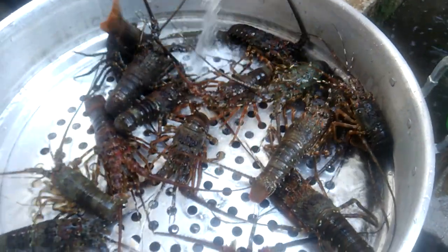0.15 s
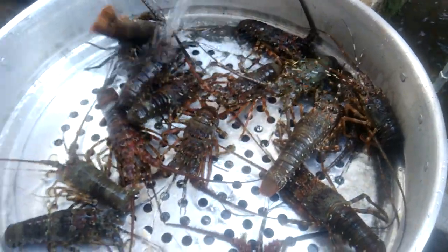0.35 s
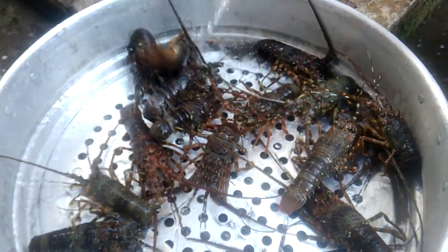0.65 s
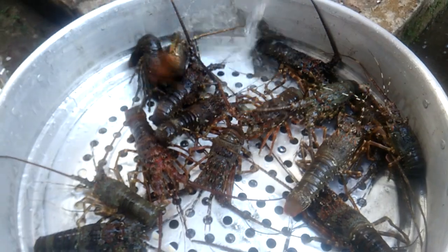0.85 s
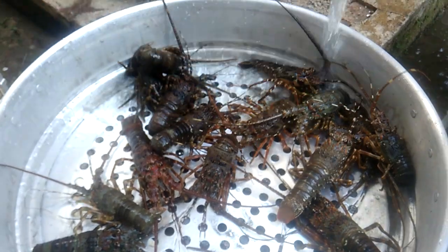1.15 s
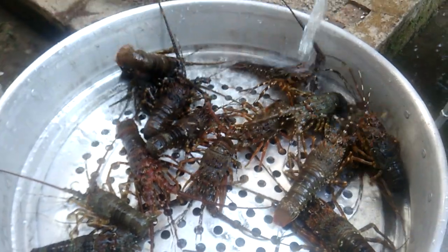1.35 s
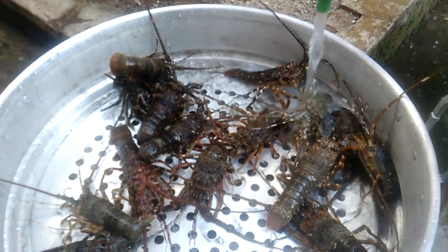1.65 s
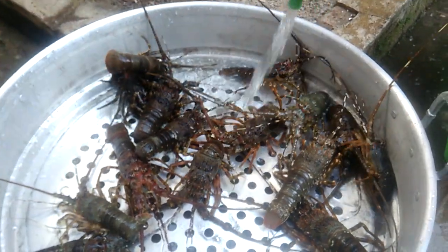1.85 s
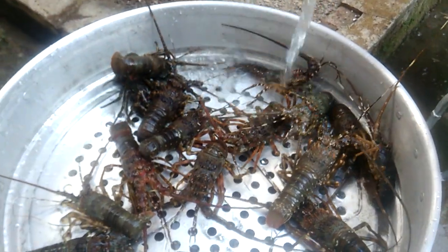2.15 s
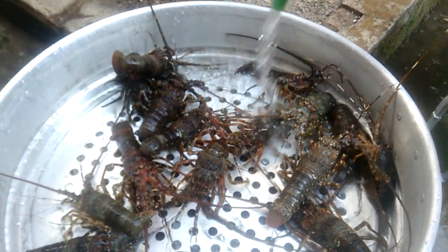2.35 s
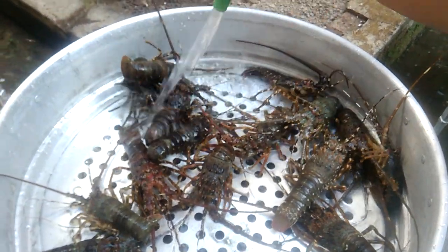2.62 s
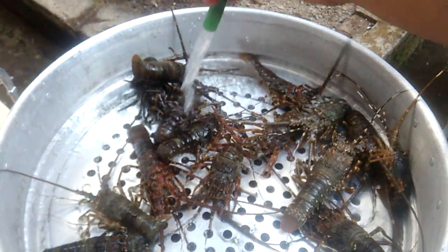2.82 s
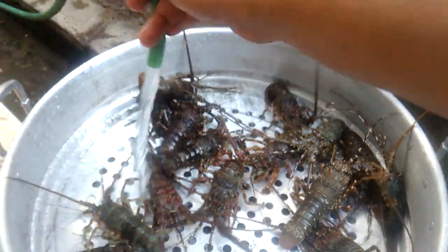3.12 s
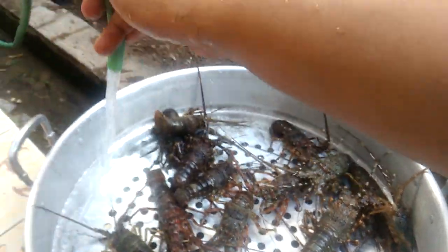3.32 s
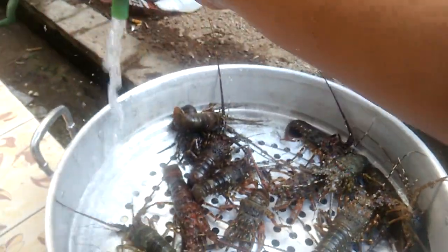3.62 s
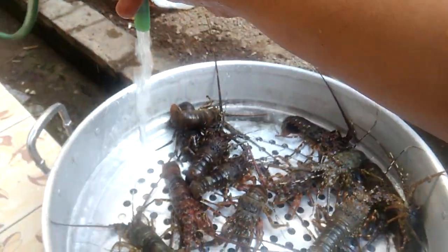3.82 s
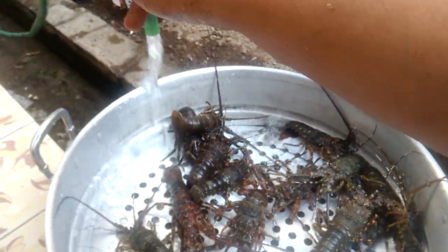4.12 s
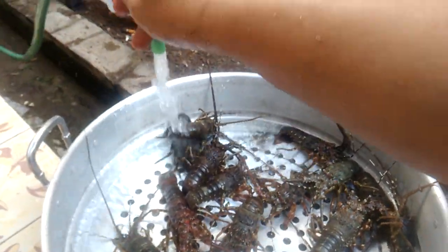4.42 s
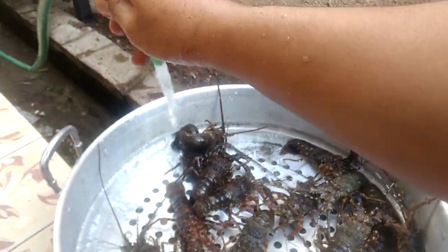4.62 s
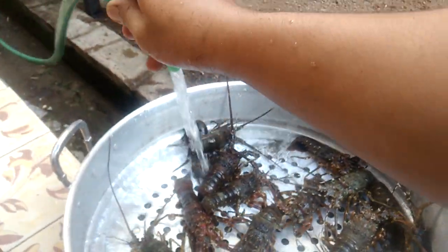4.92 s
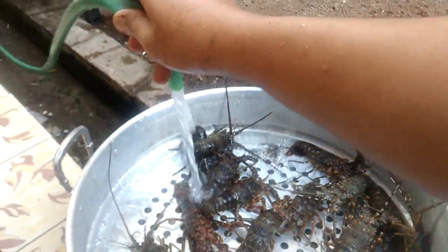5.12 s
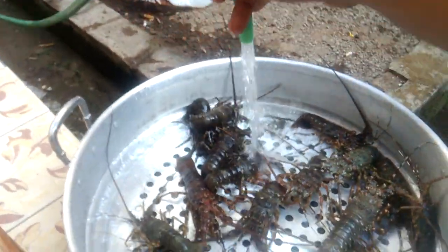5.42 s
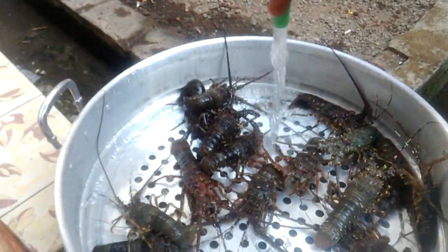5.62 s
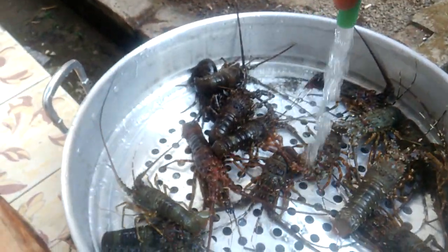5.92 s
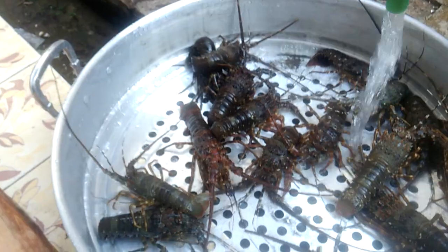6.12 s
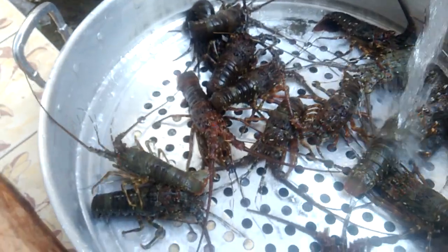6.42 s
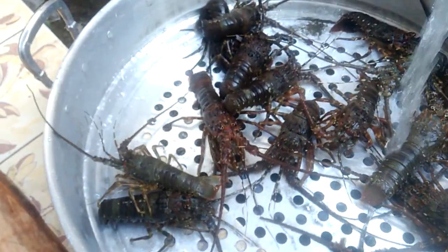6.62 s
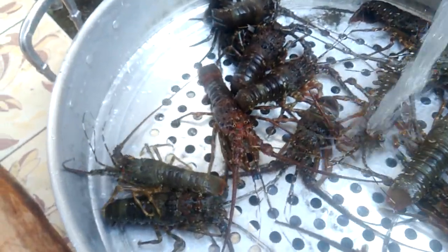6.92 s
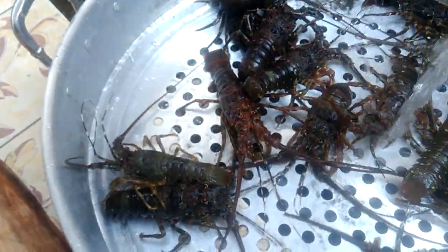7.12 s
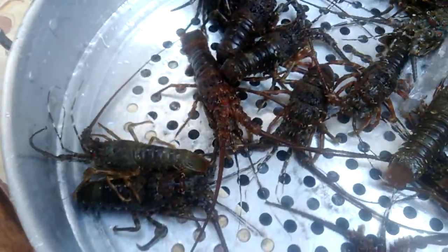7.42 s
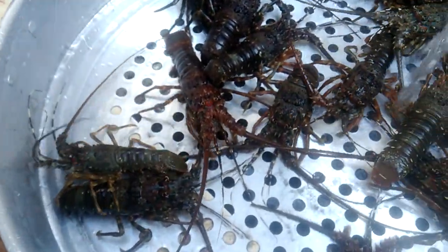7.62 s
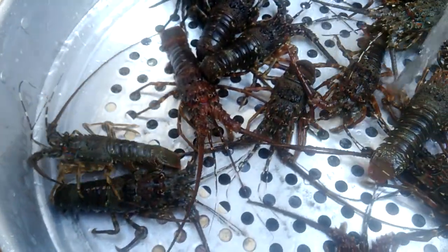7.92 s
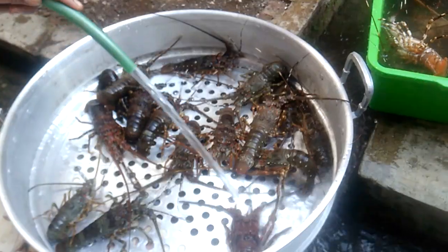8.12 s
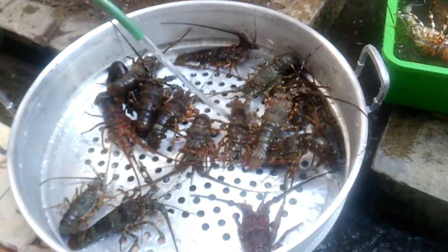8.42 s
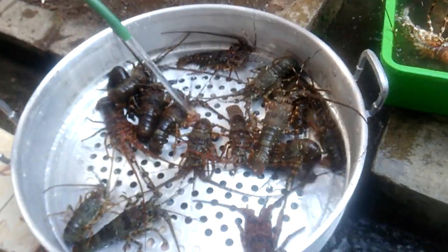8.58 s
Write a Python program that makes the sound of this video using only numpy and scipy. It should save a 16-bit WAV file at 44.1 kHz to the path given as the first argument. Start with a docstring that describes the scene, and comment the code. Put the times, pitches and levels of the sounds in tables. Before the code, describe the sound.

Water runs continuously from a garden hose onto hard shells and thin metal, crisp and sizzling, slightly wide in the treble. Slapping lumps and low thuds crowd the first second; two clanks ring the pot around three seconds. Patter and gurgles wander, a gliding hiss rises toward seven seconds, and a sudden cut leaves quieter water over low rumble.

```python
"""A garden hose jet plays over spiny lobsters in a perforated aluminium steamer pot, outdoors.
Random impacts, filtered and rung, crackle on shells, patter in film and drum on metal in lumps; pools gurgle.
Slugs splat, big drops spit, shells tick, bubbles and air pockets ring; the jet fans off a shell's back.
Two knocks ring the modes of the pot.
Near the end, an abrupt cut: steady water is suddenly fainter and a second low rumble joins."""
import sys
import numpy as np
from scipy import signal
from scipy.fft import rfft, irfft
from scipy.io import wavfile
from scipy.ndimage import uniform_filter1d, minimum_filter1d

SR = 44100
rng = np.random.default_rng(int(sys.argv[2]) if len(sys.argv) > 2 else 0)


def log_audio(samples):
    """Write samples as a 16-bit WAV file to the path given in sys.argv[1]."""
    # one column per channel
    frames = np.atleast_2d(samples).T
    # limit to full scale, then quantise
    limited = np.clip(frames, -1, 1)
    pcm = np.round(limited * 32767).astype(np.int16)
    wavfile.write(sys.argv[1], SR, pcm)


N = 385875

# Levels are those at each source, ahead of drift, gliding colour and limiter.
# Jet on the shells, before CUT_WATER_DB: time_s [s], spray_db [dB]
ON_SHELLS = [(0, -45), (1.0, -41.5), (1.65, -41.5), (2.03, -46), (2.3, -42.5), (3.05, -43.5), (3.38, -50.5),
             (3.75, -43), (4.12, -49), (4.3, -46.5), (4.6, -48.5), (4.9, -45), (5.17, -52), (5.7, -43),
             (6.4, -44.5), (6.75, -49.5), (6.98, -44), (7.12, -42), (7.32, -38), (7.52, -44), (7.75, -36),
             (7.97, -37.5), (8.13, -43), (8.16, -29), (8.3, -31.5), (8.5, -25)]
# Jet in the water film, before CUT_WATER_DB: time_s [s], patter_db [dB]
ON_FILM = [(0, -56), (0.6, -52), (0.95, -54), (1.08, -45), (1.65, -47.5), (1.9, -54), (2.45, -60),
           (2.65, -62.5), (3.0, -56), (3.5, -57), (3.9, -57.5), (4.12, -78), (4.35, -57), (4.6, -67),
           (5.05, -55.5), (5.2, -65.5), (5.48, -54), (5.62, -64), (5.82, -51), (6.17, -57), (6.35, -49),
           (6.57, -58), (6.9, -48), (7.15, -51), (7.33, -47), (7.5, -50.5), (7.85, -46.5), (8.0, -50.5),
           (8.13, -44.5), (8.25, -41.5), (8.55, -38)]
# Jet on the bare pot floor, before CUT_WATER_DB: time_s [s], drumming_db [dB]
ON_METAL = [(0, -61.5), (0.95, -61), (1.08, -51.5), (1.55, -49.5), (1.95, -54.5), (2.35, -55), (2.7, -70.5),
            (3.0, -60), (3.7, -70), (4.05, -57.5), (4.55, -64.5), (5.0, -58.5), (5.6, -69), (6.5, -66.5),
            (7.25, -66.5), (7.75, -59), (8.13, -65), (8.2, -42.5), (8.5, -47)]
# Jet in pooled water, before CUT_WATER_DB: time_s [s], gurgle_db [dB]
IN_POOL = [(0, -64), (0.8, -70.5), (1.6, -70.5), (2.0, -59.5), (2.35, -69), (3.1, -60), (3.75, -67),
           (4.1, -54.5), (4.55, -65), (4.9, -59), (5.15, -66), (5.45, -68.5), (5.85, -60), (6.9, -66),
           (7.7, -61), (8.1, -63.5), (8.6, -41)]
# Resonances of the spot being hit: time_s [s], water_hollow_hz [Hz], pot_floor_hz [Hz]
SPOT = [(0, 4000, 670), (0.55, 3260, 696), (0.9, 2260, 690), (1.08, 2250, 1320), (1.3, 3100, 1030),
        (1.9, 2900, 1030), (2.2, 2390, 1370), (2.7, 2900, 795), (3.22, 2200, 820), (3.8, 3150, 780),
        (4.24, 2050, 800), (4.75, 3260, 810), (5.5, 2900, 820), (6.0, 2550, 670), (6.35, 3300, 660),
        (6.7, 2000, 726), (7.0, 2500, 766), (7.32, 2090, 1300), (7.75, 2220, 1290), (8.0, 2450, 705),
        (8.13, 3100, 694), (8.19, 3280, 1300), (8.5, 3120, 690)]
# Colour glide as the jet crosses the shells: time_s [s], centre_hz [Hz], gain_db [dB]
GLIDE = [(0, 5100, -1.5), (1.65, 4800, -0.5), (1.95, 4340, -2.5), (4.3, 5200, -1), (5.2, 4290, -5.5),
         (5.7, 5100, -2.5), (6.17, 4620, -7), (6.35, 5000, -1), (6.58, 4400, -10), (6.85, 5270, 0),
         (6.98, 5500, 5.5), (7.13, 5500, -4.5), (7.32, 3880, -20), (7.5, 4050, -4.5), (7.66, 4730, 2),
         (7.8, 4740, -9.5), (8.13, 5300, -13), (8.3, 4540, 1.5)]
# Outdoor rumble: time_s [s], level_db [dB]
RUMBLE = [(0, -53), (0.75, -63.5), (1.05, -53.5), (2.2, -56), (2.45, -62.5), (2.95, -49.5), (3.5, -57),
          (4.45, -61), (4.8, -57), (6.7, -59), (8.0, -68)]
# Slugs of water: start_s [s], slap_db [dB], floor_thud_db [dB], gurgle_db [dB], drain_t60_s [s]
SPLATS = [(0.2034, -47, -37.5, -51, 0.097), (0.394, -43, -71, -72, 0.069), (0.536, -40.5, -51, -69, 0.11),
          (0.685, -47, -41, -56, 0.23), (0.752, -33, -34, -49, 0.16), (0.813, -46, -38.5, -49, 0.37),
          (0.833, -32.5, -38, -48, 0.12), (1.29, -41, -70, -72, 0.27), (1.517, -41, -39, -54, 0.13),
          (2.241, -39.5, -62, -79, 0.27), (2.393, -47, -70, -79, 0.5), (2.593, -53, -66, -49, 0.14),
          (2.822, -39, -54, -59, 0.31), (2.847, -41, -36, -44, 0.38), (3.213, -32, -38, -43.5, 0.19),
          (3.262, -46, -46, -54, 0.25), (3.387, -56, -44, -56, 0.063), (3.747, -40.5, -79, -84, 0.38),
          (3.909, -43.5, -38, -45.5, 0.083), (4.052, -66, -50, -46, 0.1), (4.164, -70, -60, -43.5, 0.064),
          (4.198, -39, -68, -76, 0.44), (4.253, -43, -44.5, -67, 0.13), (4.695, -54, -48, -47, 0.12),
          (4.8, -75, -76, -51, 0.097), (5.759, -49.5, -48, -54, 0.15), (6.477, -45.5, -47, -69, 0.085),
          (6.659, -49, -45.5, -70, 0.042), (6.99, -53, -44.5, -72, 0.2), (7.306, -46, -62, -71, 0.29),
          (7.647, -38.5, -63, -48, 0.11), (8.521, -50, -51, -50, 0.23)]
# Shell ticks and big drops: start_s [s], crack_peak_db [dB], hollow_note_db [dB re crack_peak_db]
TICKS = [(0.2843, -28, -41), (0.3536, -18, -17.5), (0.4436, -16.5, -18), (0.522, -26, -34),
         (0.5464, -15.5, -19), (0.6992, -17, -20), (0.78, -18, -34), (0.858, -23, -15.5), (0.91, -19, -25),
         (0.9372, -21, -36), (0.989, -16.5, -51), (1.129, -21, -35), (1.1496, -17, -18),
         (1.2455, -19.5, -16), (1.5267, -15.5, -14), (1.6431, -23.5, -12.5), (1.731, -21, -14),
         (1.7918, -19, -24), (2.154, -21, -31), (2.2425, -20, -35), (2.595, -25, -35), (2.9547, -16, -16),
         (3.4924, -20, -16.5), (4.0561, -22.5, -22), (4.511, -28.5, -19), (5.4538, -19, -42),
         (5.8546, -26.5, -24), (6.1406, -23, -38), (6.146, -25, -44), (6.4414, -22.5, -36),
         (6.6078, -25, -30), (6.9617, -37, -24), (6.988, -29, -21), (7.1748, -18.5, -39),
         (7.18, -17.5, -35), (7.229, -17, -37), (7.251, -13, -26), (7.39, -22, -28), (7.608, -20.5, -23),
         (7.622, -21.5, -30), (7.6536, -18.5, -22.5), (7.6645, -20, -11), (7.876, -21, -33),
         (7.94, -18, -42), (8.272, -29, -42), (8.49, -25.5, -42), (8.529, -20, -27)]
# Big drops bursting on shells: start_s [s], spray_db [dB], t60_s [s]
SPITS = [(.2849, -34, 0.35), (.3955, -40, .07), (.445, -38, 0.093), (1.041, -35, .16), (1.257, -37, 0.07),
         (1.31, -38, .14), (1.404, -34.5, 0.36), (1.66, -34.5, 0.29), (2.2857, -37, 0.062),
         (3.053, -48, 0.1), (4.693, -37, 0.17), (4.885, -37.5, 0.18), (5.0, -37.5, 0.15),
         (5.973, -33.5, 0.11), (6.035, -36.5, 0.044), (6.0816, -34, 0.044), (6.279, -33.5, 0.055),
         (6.352, -35, 0.22), (6.582, -34.5, 0.059), (7.305, -35, 0.17), (8.404, -40.5, 0.23)]
# Single bubbles, before onset and pitch rise: start_s [s], level_db [dB], pitch_hz [Hz], t60_s [s]
BLIPS = [(.519, -20, 5650, 0.024), (1.022, -23.5, 5460, 0.029), (1.036, -31, 1600, 0.045),
         (1.185, -28, 1580, 0.028), (1.879, -32, 990, 0.032), (2.193, -15, 5570, 0.015),
         (2.394, -37.5, 1060, 0.073), (3.752, -11.5, 2820, 0.01), (4.201, -17, 3240, 0.021),
         (4.255, -22, 3450, 0.024), (4.57, -32, 1550, 0.022), (5.978, -29.5, 2690, 0.016),
         (7.322, -29, 2040, 0.03), (7.688, -34, 1310, 0.034)]
# Knocks, one spot each: start_s [s], ring_db [dB], build_up_time_constant_s [s], clash_peak_db [dB]
KNOCKS = [(2.85, -33.5, 0.004, -7.5), (3.2141, -40, 0.0019, -10.5)]
# Pot modes: freq_hz [Hz], first_spot_db [dB re ring_db], second_spot_db [dB re ring_db], t60_s [s]
POT = [(267, -4, -4, 0.22), (537, -6.5, -16, 0.34), (732, 5.5, 7.5, 0.24), (854, 4, -19, 0.23),
       (1040, 3, 0, 0.24), (1100, 7, 5, 0.15), (1189, 1.5, 5, 0.23), (1300, -3, -1, 0.32),
       (1416, 11, 15, 0.055), (1550, -8, -4, 0.29), (1730, -19, 4.5, 0.13), (2267, 5, 18, 0.058),
       (3300, -2, 4.5, 0.099), (3570, 6, 7, 0.065)]
# Narrow-band swells: ringing air between shells, and one low splash (8.152 s):
# start_s [s], length_s [s], level_db [dB], centre_hz [Hz], width_hz [Hz]
POCKETS = [(3.709, 0.056, -51.5, 2800, 240), (5.06, 0.065, -60, 2890, 200), (5.348, 0.2, -64, 2820, 150),
           (6.289, .14, -58, 4050, 1500), (7.901, .255, -58, 3540, 597), (8.152, .09, -58, 1140, 600)]
# Sheet of water off a shell's back; pitch glides, mostly downwards until 7.36 s, then creeps up:
# time_s [s], hiss_db [dB], hiss_hz [Hz]
FAN = [(5.5, -79, 12900), (6.3, -55, 12300), (6.78, -55.5, 11300), (6.85, -50, 10600), (7.04, -53, 11100),
       (7.13, -41.5, 9400), (7.26, -45, 7700), (7.36, -46, 6800), (7.5, -40.5, 7100), (7.7, -46.5, 6900),
       (7.95, -43, 7240), (8.138, -43, 8300), (8.146, -56, 8500)]
# Treble colour of spray, ticks and clashes, peaking near 7.3 kHz: freq_hz [Hz], gain_db [dB]
DROP_COLOUR = [(400, -35), (1500, -55), (3400, -24.5), (4600, -22), (5500, -11), (6300, -2.5), (6900, 2.5),
               (7300, 6), (8000, 0), (9000, -9), (10300, -15), (12000, -22.5), (14500, -25.5)]
# Spectrum of slaps in the water film: freq_hz [Hz], gain_db [dB]
PATTER_COLOUR = [(900, -14.5), (1250, -14.5), (1530, -5), (1700, -8.5), (1900, -5), (2060, -13),
                 (2240, -5.5), (2450, -7.5), (2700, -9), (3350, -5), (4000, -5.5), (4500, -3.5),
                 (5500, -0.5), (7000, -13.5)]
# Spectrum of the beaten pot floor: freq_hz [Hz], gain_db [dB]
DRUM_COLOUR = [(300, -14.5), (450, -7), (530, 1), (575, 4), (645, 11.5), (720, 6.5), (800, 8), (880, 5.5),
               (1000, 5), (1250, 2), (1600, 5), (2400, -2.5)]
# Spectrum of outdoor rumble: freq_hz [Hz], gain_db [dB]
RUMBLE_COLOUR = [(20, -38), (40, -4.5), (62, 6), (80, 9.5), (120, 2.5), (180, -2), (300, -23), (700, -51),
                 (2000, -16)]
# Side filter, wider at short wavelengths: freq_hz [Hz], side_gain_db [dB]
WIDTH = [(3500, -39), (5200, -22), (6300, -11.5), (7300, -11.5), (8500, -3.5), (13000, -1)]

CUTOFF_HZ = 14350
MIST_DB = 5.5  # peak lift of the top of the spray
SPLAT_RISE_T60_S, SPLAT_SPRAY_DB = 0.02, 2  # spray is relative to the slap
# Abrupt cut: time, step in the jet's four aim levels, rumble that joins
CUT_S, CUT_WATER_DB = 8.142, -22.5
NEW_RUMBLE_DB, NEW_RUMBLE_LOW_HZ, NEW_RUMBLE_HIGH_HZ = -52.5, 61, 151


def from_db(db):
    """Decibels to gain."""
    return 10 ** (np.asarray(db) / 20)


def rms_one(x):
    """Scale to unit rms."""
    return x / np.sqrt(np.mean(x ** 2) + 1e-20)


def in_time(rows):
    """Interpolate each column after time_s to sample rate."""
    time_s, *columns = np.transpose(rows)
    return [np.interp(np.arange(N) / SR, time_s, column) for column in columns]


def dying(t60_s, size=22050):
    """Exponential decay from 1, down 60 dB at t60_s."""
    return np.exp(-np.log(1000) * np.arange(size) / SR / t60_s)


def add(out, start_s, sound):
    """Mix a sound in at start_s."""
    at = max(round(start_s * SR), 0)
    out[..., at:at + sound.shape[-1]] += sound[..., :N - at]


def butter(x, hz, kind, order=2):
    """Causal Butterworth filter."""
    return signal.sosfilt(signal.butter(order, hz, kind, fs=SR, output="sos"), x + 1e-18)


def peak_band(x, hz, q):
    """Band of unit peak gain at hz."""
    return signal.lfilter(*signal.iirpeak(hz, q, fs=SR), x)


def coloured(x, spectrum, size=4096):
    """Causal minimum-phase filter with the given spectrum, built from its cepstrum."""
    hz, db = np.transpose(spectrum)
    bins_hz = np.maximum(np.arange(size // 2 + 1) * SR / size, 1)
    gain = from_db(np.interp(np.log(bins_hz), np.log(hz), db))
    cepstrum = irfft(np.log(gain))[:size // 2]
    cepstrum[1:] *= 2
    response = irfft(np.exp(rfft(cepstrum, size)))
    response = response.reshape((1,) * (x.ndim - 1) + (-1,))
    return signal.oaconvolve(x, response, axes=-1)[..., :x.shape[-1]]


def ring(clicks, hz, t60_s):
    """Two-pole resonator: a unit click sets off a decaying sine of height 1."""
    r = np.exp(-np.log(1000) / (t60_s * SR))
    w = 2 * np.pi * hz / SR
    return signal.lfilter([0, np.sin(w)], [1, -2 * r * np.cos(w), r * r], clicks + 1e-18)


def impacts(per_s, spread_db):
    """Clicks of either sign at random moments; dB heights are exponential, capped at 4 spreads."""
    clicks = np.zeros(N)
    at = np.flatnonzero(rng.random(N) < per_s / SR)
    chance = rng.uniform(-1, 1, N)[at]
    height_db = spread_db * np.minimum(-np.log(np.abs(chance)), 4)
    clicks[at] = np.sign(chance) * from_db(height_db)
    return clicks


def packets(per_s, spread_db, t60_s, steady):
    """Envelope of sudden surges that die away over a steady part; mean power 1."""
    power = signal.oaconvolve(impacts(per_s, spread_db) ** 2, dying(t60_s / 2))[:N]
    return np.sqrt((np.abs(power) / power.mean() + abs(steady)) / (1 + abs(steady)))


def bubbles(low_hz, high_hz, per_s, cycles, spread_db, count=14):
    """Bubbles ring for some cycles to -60 dB, with equal energy at every pitch; rms 1."""
    born = impacts(per_s, spread_db)
    dealt = rng.integers(0, count, N)
    out = 0
    for k, hz in enumerate(np.geomspace(low_hz, high_hz, count)):
        out = out + np.sqrt(hz) * ring(born * (dealt == k), hz, cycles / hz)
    return rms_one(out)


def in_pot(clicks, t60_s, echo_db, count=4):
    """Impacts on several spots, each with its own quick wall reflections; rows are mid and side."""
    dealt, out = rng.integers(0, count, N), 0
    for spot in range(count):
        echoes = rng.standard_normal((2, 4096)) * dying(t60_s, size=4096)
        echoes *= from_db(echo_db) / np.linalg.norm(echoes, axis=1, keepdims=True)
        echoes[:, 0] = 1, np.cos(np.pi * (spot + .5) / count)  # direct sound
        out = out + signal.oaconvolve((clicks * (dealt == spot))[None], echoes, axes=1)[:, :N]
    return out / np.sqrt(1 + from_db(echo_db) ** 2)


def wander(depth_db, rate_hz):
    """Randomly drifting gain: noise at SR / 40 through two one-pole low-passes at rate_hz."""
    r = np.exp(-80 * np.pi * rate_hz / SR)
    slow = signal.lfilter([1], [1, -2 * r, r * r], rng.standard_normal(N // 40 + 2002))[2000:]
    return np.repeat(from_db(depth_db * np.clip(rms_one(slow), -2, 2)), 40)[:N]


def hollows(x, low_hz, high_hz, q, depth_db, rate_hz, count=8):
    """Gaps between shells open and flood as the jet moves, so their resonances come and go."""
    y = x
    for hz in np.geomspace(low_hz, high_hz, count):
        y = y + (wander(depth_db, rate_hz) - 1) * peak_band(y, hz, q)
    return y * np.std(x) / np.std(y)


def gliding(x, hz, gain_db, q, size):
    """Cut or boost that follows curves of pitch and gain, block by block."""
    y, state = x.copy(), np.zeros(x.shape[:-1] + (2,))
    for i in range(0, N, size):
        peak = signal.iirpeak(hz[i], q, fs=SR)
        band, state = signal.lfilter(*peak, x[..., i:i + size], zi=state)
        y[..., i:i + size] += (from_db(gain_db[i]) - 1) * band
    return y


def swept(x, hz, q, boost_db):
    """Resonance that follows a pitch curve at unchanged overall level."""
    y = gliding(x, hz, np.full(N, boost_db), q, size=512)
    return y * np.std(x) / np.std(y)


def spray(strength, mist_db):
    """Thousands of droplets a second crackle on the shells; rows are mid and side."""
    drops = rms_one(impacts(per_s=3600, spread_db=2.6))
    crackle = coloured(in_pot(drops * strength, t60_s=0.013, echo_db=1.0, count=8), DROP_COLOUR)
    crackle = crackle / np.std(coloured(drops, DROP_COLOUR))
    crackle = hollows(crackle, low_hz=5000, high_hz=14000, q=6.5, depth_db=2.4, rate_hz=18.0)
    # fine mist sizzles at the top
    return crackle + (from_db(mist_db) - 1) * peak_band(crackle, 12300, 3)


def patter(strength, spot_hz):
    """Drops slap into the water film and trap small bubbles."""
    hits = in_pot(impacts(per_s=2100, spread_db=1.5), t60_s=0.062, echo_db=2.0, count=2)[0]
    slaps = rms_one(coloured(hits, PATTER_COLOUR))
    slaps = hollows(slaps, low_hz=1600, high_hz=5220, q=5.6, depth_db=5.5, rate_hz=15.8)
    fizz = bubbles(low_hz=1626, high_hz=5400, per_s=420, cycles=50, spread_db=3.2, count=24)
    return strength * rms_one(swept(slaps + from_db(-9) * fizz, spot_hz, q=5.6, boost_db=6.0))


def drumming(strength, thud, spot_hz):
    """The jet beats one loaded, damped spot of the pot floor; a slug hits the whole floor at once."""
    floor = rms_one(coloured(impacts(per_s=1500, spread_db=0.5), DRUM_COLOUR))
    beats = hollows(floor, low_hz=513, high_hz=1600, q=19.0, depth_db=8.5, rate_hz=6.3, count=6)
    plips = bubbles(low_hz=593.0, high_hz=1670, per_s=320, cycles=55, spread_db=2.6, count=16)
    jet = swept(beats + from_db(-7.0) * plips, spot_hz, q=4.6, boost_db=9.0)
    return strength * rms_one(jet) + thud * floor


def gurgle(strength):
    """Large, short-lived bubbles where the jet digs into a pool; the pot's air booms with them."""
    glugs = bubbles(low_hz=220.3, high_hz=680, per_s=660, cycles=24.0, spread_db=3.5)
    boom = peak_band(glugs, 300, 6.0)
    return strength * rms_one(glugs + from_db(-3.5) * boom)


def droplets(strength):
    """Lone drops snap on the shells and trap small bubbles at many pitches."""
    snaps = bubbles(low_hz=6300, high_hz=9000, per_s=170, cycles=38, spread_db=3.4, count=16)
    plinks = bubbles(low_hz=2400, high_hz=6200, per_s=70, cycles=48, spread_db=3.2, count=24)
    return strength * (from_db(-8) * snaps + from_db(-24) * plinks)


def rumble(after_cut):
    """Low outdoor noise swells and sinks; a second band joins after the cut."""
    level_db, = in_time(RUMBLE)
    outdoor = rms_one(coloured(rng.standard_normal(N), RUMBLE_COLOUR, size=8192))
    edges_hz = [NEW_RUMBLE_LOW_HZ, NEW_RUMBLE_HIGH_HZ]
    joining = rms_one(butter(rng.standard_normal(N), edges_hz, "bandpass"))
    outdoor = from_db(level_db) * wander(depth_db=2.5, rate_hz=9.6) * outdoor
    return outdoor + from_db(NEW_RUMBLE_DB) * after_cut * joining


def splat_surges():
    """Each slug swells and drains away: strengths of slap, thud and gurgle, summed as power."""
    power = np.zeros((3, N))
    for start_s, *levels_db, t60_s in SPLATS:
        swell = (1 - dying(SPLAT_RISE_T60_S)) * dying(t60_s)
        add(power, start_s, np.outer(from_db(levels_db), swell / swell.max()) ** 2)
    return np.sqrt(power)


def ticks(tail_t60_s, tail_db, body_t60_s, size=4096):
    """Hard crack, scattering droplets and a shell's rough, hollow note; rows are mid and side."""
    out = np.zeros((2, N))
    snap = dying(.011, size)
    scatter = packets(per_s=490, spread_db=5.0, t60_s=0.0061, steady=0.24)
    for start_s, peak_db, hollow_db in TICKS:
        at = int(start_s * SR)
        after = scatter[at:at + size] * dying(tail_t60_s, size)
        bursts = rng.standard_normal((2, 2, size)) * np.array([[snap], [after]])
        crack, tail = coloured(bursts, DROP_COLOUR)
        both = crack / np.abs(crack).max(axis=1, keepdims=True)
        both = both + from_db(tail_db) * tail / np.abs(tail).max()
        # first contact: broad, bright, mid only
        edge = butter(rng.standard_normal(size) * snap ** 2, 6100, "highpass")
        add(out, start_s, from_db(peak_db) * (both + from_db(-16) * edge * [[1], [0]]))
        pitches_hz = np.array([1900, 3000, 3600]) * np.exp(rng.normal(0, 0.11, size=3))
        push = rng.standard_normal(size) * dying(body_t60_s, size)
        note = sum(ring(push, hz, 0.0081) for hz in pitches_hz)
        add(out[0], start_s, from_db(peak_db + hollow_db) * note / np.abs(note).max())
    return out


def spit_surges():
    """Each big drop bursts at once and its spatter thins out; summed as power."""
    power = np.zeros(N)
    for start_s, spray_db, t60_s in SPITS:
        add(power, start_s, (from_db(spray_db) * dying(t60_s)) ** 2)
    return np.sqrt(power)


def blips(glide):
    """A bubble rings unevenly, its pitch rising by the fraction glide as it nears the surface."""
    out = np.zeros(N)
    for start_s, level_db, hz, t60_s in BLIPS:
        decay = dying(t60_s)
        wobble = rms_one(butter(rng.standard_normal(len(decay)), 400, "lowpass"))
        pitch_hz = hz * (1 + glide * (1 - dying(t60_s * 2)) + .05 * wobble)
        tone = np.sin(2 * np.pi * np.cumsum(pitch_hz) / SR)
        add(out, start_s, from_db(level_db) * decay * (1 - dying(0.02)) * tone)
    return out


def knocks(clash_t60_s):
    """A blow gives a rattling clash and sets the pot's modes ringing; rows are mid and side."""
    out = np.zeros((2, N))
    modes_hz, *spots_db, t60s_s = np.transpose(POT)
    decays = np.array([dying(t60_s) for t60_s in t60s_s])
    size = decays.shape[1]
    # the shifting load damps each mode unevenly
    decays = decays * [wander(depth_db=2.0, rate_hz=35)[:size] for _ in modes_hz]
    turns = np.outer(modes_hz, np.arange(size) / SR)
    rattle = packets(per_s=260, spread_db=-2.0, t60_s=0.013, steady=0.55)[-size:]
    for (start_s, ring_db, build_s, clash_db), mode_db in zip(KNOCKS, spots_db):
        sines = np.sin(2 * np.pi * (turns + rng.random((len(modes_hz), 1))))
        rings = from_db(ring_db + mode_db) @ (decays * sines)
        add(out[0], start_s, rings * (1 - dying(build_s * np.log(1000))))
        clash = rng.standard_normal((2, size)) * rattle * dying(clash_t60_s)
        clash = butter(coloured(clash, DROP_COLOUR), 5100, "lowpass")
        add(out, start_s, from_db(clash_db) * clash / np.abs(clash).max())
    return out


def pockets():
    """Narrow bands of noise swell and fade: stirred air ringing, and one low splash."""
    out = np.zeros(N)
    for start_s, length_s, level_db, hz, width_hz in POCKETS:
        stir = rng.standard_normal(SR)
        note = rms_one(butter(stir, [hz - width_hz / 2, hz + width_hz / 2], "bandpass"))
        swell = signal.windows.tukey(int(length_s * SR), .3)
        add(out, start_s, from_db(level_db) * swell * note[-len(swell):])
    return out


def fan(strength, hz):
    """A thin sheet tears into droplets that hiss in one gliding resonance; rows are mid and side."""
    drops = in_pot(impacts(per_s=14000, spread_db=3.0), t60_s=0.015, echo_db=-6)
    drops = butter(drops, 3800, "highpass")
    hiss = swept(drops, np.minimum(hz, .45 * SR), q=5.0, boost_db=15)
    return strength * hiss / np.std(hiss[0])


def scene():
    """Aim shares out the jet; common lumps drive the steady spray, patter, drumming and fan."""
    hollow_hz, floor_hz = in_time(SPOT)
    fan_db, fan_hz = in_time(FAN)
    after_cut = np.arange(N) / SR > CUT_S
    aims = (ON_SHELLS, ON_FILM, ON_METAL, IN_POOL)
    shells, film, metal, pool = (from_db(in_time(aim)[0] + CUT_WATER_DB * after_cut) for aim in aims)
    slap, thud, plunge = splat_surges()
    spits = spit_surges()
    lumps = packets(per_s=130, spread_db=1.7, t60_s=0.08, steady=1.0)

    spray_parts = [shells * lumps, spits, from_db(SPLAT_SPRAY_DB) * slap]
    water = spray(np.linalg.norm(spray_parts, axis=0), MIST_DB)
    water += fan(from_db(fan_db) * np.sqrt(lumps), fan_hz)
    water[0] += patter(np.hypot(film * lumps, slap), hollow_hz)
    water[0] += droplets(np.hypot(shells, spits / 2))
    water += ticks(tail_t60_s=.07, tail_db=-8, body_t60_s=.05)
    water = gliding(water, *in_time(GLIDE), q=2.0, size=256)

    mid, side = water + knocks(clash_t60_s=0.075)
    mid += blips(glide=0.037) + pockets() + rumble(after_cut)
    mid += drumming(metal * lumps * wander(depth_db=-1.85, rate_hz=2.5), thud, floor_hz)
    mid += gurgle(np.hypot(pool * wander(depth_db=1.0, rate_hz=11.3), plunge))
    side = coloured(side, WIDTH)  # only the treble is wide
    return np.array([mid + side, mid - side])


def record(dry):
    """A fast limiter, linked across both channels, holds the loudest peaks; then the top is cut."""
    ceiling = .2  # full scale is 1
    gain = ceiling / np.maximum(np.abs(dry).max(axis=0), ceiling)
    gain = uniform_filter1d(minimum_filter1d(gain, size=65), size=65)
    top_cut = signal.ellip(14, .1, 85, CUTOFF_HZ, fs=SR, output="sos")
    return signal.sosfilt(top_cut, dry * gain)


dry = scene()
out = record(dry)
log_audio(out)
```